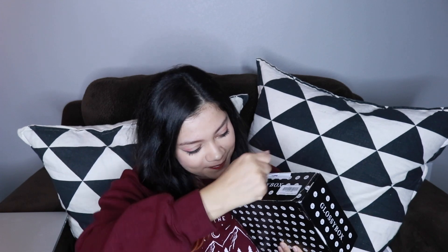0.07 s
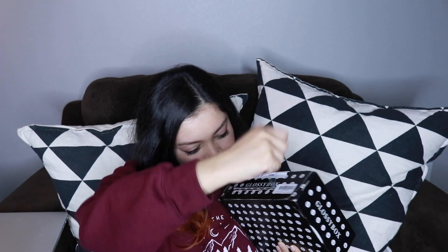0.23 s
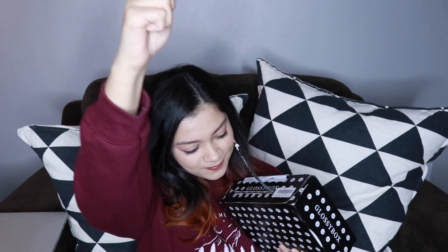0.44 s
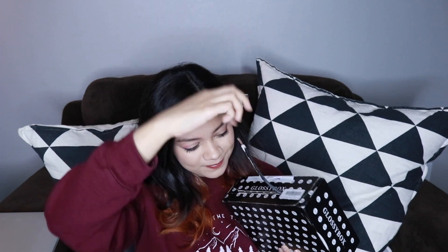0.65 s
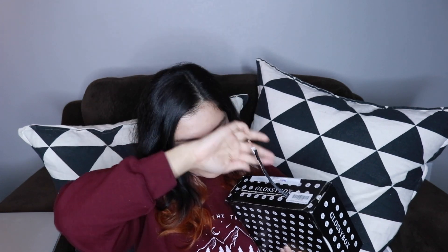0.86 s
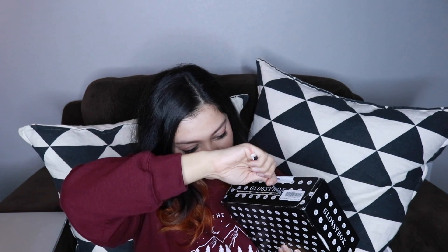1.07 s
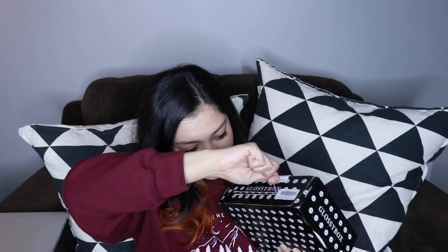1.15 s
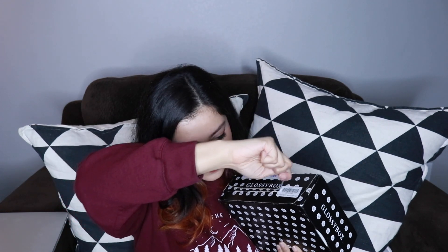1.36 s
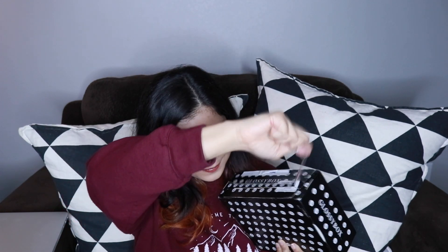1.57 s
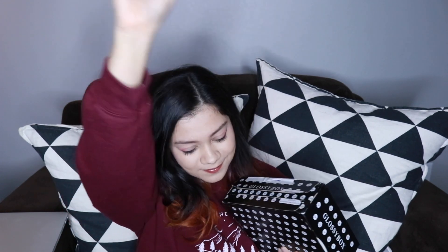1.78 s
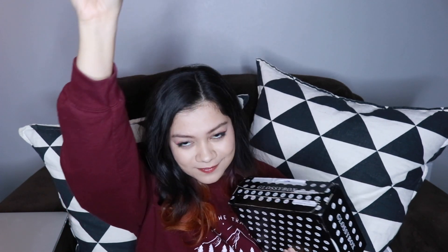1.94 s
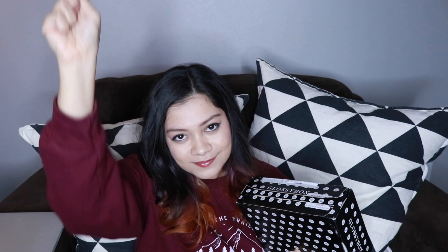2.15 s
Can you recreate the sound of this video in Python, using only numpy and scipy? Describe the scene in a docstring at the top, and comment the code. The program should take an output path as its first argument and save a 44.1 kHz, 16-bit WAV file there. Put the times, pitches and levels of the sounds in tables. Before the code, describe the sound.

Cardboard box pull strip ripped off in two loud, raspy tears, close up in a small room

```python
"""In a small room, close to the microphone, the pull strip of a cardboard box is ripped off in two hard pulls.
The strip gives in quick slips: each shakes the hollow box (a bank of resonances) and breaks a bunch of fibres
(dense clicks, coloured as rasp and fizz). Each pull ends in a snap; single cracks come between and within pulls.
Between the pulls fingers rub and tick softly, finding a new grip. Reflections, standing waves and a noise wash
make the room, over a faint room tone. The one microphone is louder on the left, and the tears overload it."""
import sys
import numpy as np
from scipy import signal
from scipy.fft import rfft, irfft, next_fast_len
from scipy.io import wavfile
from scipy.ndimage import uniform_filter1d

SR = 44100
rng = np.random.default_rng(int(sys.argv[2]) if len(sys.argv) > 2 else 0)


def generate_wav(sig):
    """Save sig (samples, or channels by samples) to the path in sys.argv[1] as 16-bit PCM at SR."""
    pcm = np.round(np.clip(np.atleast_2d(sig).T, -1, 1) * 32767).astype(np.int16)
    wavfile.write(sys.argv[1], SR, pcm)


N = 97328
TIME = np.arange(N) / SR  # s

# Fizz of the finest fibres in the second pull and in the cracks, relative: freq_hz, density_db (per Hz)
FIZZ_2 = [(100, -48), (2500, -30), (5500, -3), (8500, 0), (11000, -4.5), (14000, -5), (16000, -8.5)]
# Reverberation of the room: freq_hz, level_db (against direct sound), t60_s
ROOM = [(60, -20, .4), (150, -17.5, 0.48), (300, -19, 0.59), (600, -11.5, 0.65), (1340, -7.5, 0.82),
        (2160, -11, 0.68), (3900, -5.5, 0.84), (5000, -7.5, .7), (7000, -9.5, 0.63), (11000, -20, 0.56),
        (16000, -16, .35)]


def pulls():
    """Two hard pulls on the strip, each with its own course, speed and fibre colours."""
    # Course of each pull, before the balance of the parts: time_s, drone_db (box), rasp_db, fizz_db (treble)
    pull_1 = [(0, 10.5, 5, -14), (0.03, 8, 1, -15.5), (0.075, 10, -1.5, -15), (0.1, 5.5, -31, -21),
              (0.12, -0.5, -15, -22), (0.138, 8, -2.5, -12.5), (0.156, 4.5, -10, -26), (0.168, 2, -2, -24),
              (0.18, -12.5, -12, -23), (0.2, 5, -4, -29), (0.225, 1.5, 3, -20), (0.262, 6, -6, -28),
              (0.28, -2.5, -1.5, -25), (0.298, 0.5, -8.5, -19), (0.315, -4, -4, -32),
              (0.335, -51.5, -42, -70)]
    pull_2 = [(1.425, -50, -47, -62), (1.44, -22, -10, -25), (1.455, -15, -10, -22.5),
              (1.468, -0.5, -5, -20.5), (1.49, -1, -6, -19), (1.512, -8.5, -5.5, -18),
              (1.53, 1, -10.5, -17.5), (1.56, -1, -5, -15.5), (1.6, 3.5, -12.5, -17.5),
              (1.62, -4, -3.5, -13), (1.633, -1, 1, -19), (1.641, 5, -27, -12), (1.655, 6, -14, -8.5),
              (1.68, -53, -53, -60)]
    # Speed of each pull, as the rate at which the strip slips: time_s, rate_slips_per_s
    speed_1 = [(0.0, 347), (0.066, 296), (0.148, 265), (0.176, 299), (0.3, 287)]
    speed_2 = [(1.45, 276.9), (1.59, 300.9), (1.65, 258.6)]
    # Rasp of the breaking fibres in each pull, relative: freq_hz, density_db (per Hz)
    rasp_1 = [(40, -57), (250, -11), (620, -5), (800, 2.5), (1080, -5), (1300, -9), (1450, 4), (1620, -4.5),
              (2000, -4), (2700, -18.5), (3700, -12.5), (5000, -17.5), (7000, -27), (12000, -38)]
    rasp_2 = [(40, -44), (250, -9), (620, -7), (900, 0), (1220, -3), (1600, -6.5), (2300, -11), (3000, -13),
              (4100, -9), (5000, -18.5), (7000, -36), (12000, -57)]
    # Fizz of the finest fibres in the first pull, relative: freq_hz, density_db (per Hz)
    fizz_1 = [(100, -46), (2500, -6), (5500, -19), (8500, -0.5), (11000, -4), (14000, -1), (16000, -7.5)]
    first = tear(pull_1, speed_1, rasp_1, fizz_1, 0)
    second = tear(pull_2, speed_2, rasp_2, FIZZ_2, 1)
    return first + second


def tear(curve, speed, rasp_colour, fizz_colour, pull):
    """Each slip shakes the box and breaks a bunch of fibres; pull is 0 for the first, 1 for the second."""
    # Grain of each pull: jitter (of slip timing, log ratio), spread_db (of slip strength),
    # steady_share (of fibres that break between slips)
    grains = [(.24, 2.5, 1), (.2, 7, 0.4)]
    drone_db, rasp_db, fizz_db = -4.5, -6, -4  # balance of the three parts
    even_s, surge_s = 0.0054, 0.0083  # a steady pull evens out the drone; the rasp surges freely within surge_s
    slip_fade_s = 0.0033
    drone_gain, rasp_gain, fizz_gain = gains(curve)
    jitter, spread_db, steady_share = grains[pull]
    jerks = slips(speed, jitter, spread_db)
    bunches = steady_share + signal.lfilter([1], [1, -np.exp(-1 / (slip_fade_s * SR))], jerks)
    drone = evened(box(jerks, pull), even_s)
    rasp = evened(colour(bunches * fibres(), rasp_colour), surge_s)
    fizz = evened(colour(bunches * fibres(), fizz_colour), surge_s)
    return (from_db(drone_db) * drone_gain * drone
            + from_db(rasp_db) * rasp_gain * rasp
            + from_db(fizz_db) * fizz_gain * fizz)


def slips(speed, jitter, spread_db, count=400):
    """Uneven train of jerks, coming faster as the strip is pulled faster."""
    time_s, rate = np.transpose(speed)
    chance = rng.standard_normal((count, 2))
    moving = TIME > time_s[0] - 0.05
    travelled = np.cumsum(np.interp(TIME, time_s, rate) * moving) / SR  # counted in mean slips
    steps = np.exp(jitter * chance[:, 0] - jitter ** 2 / 2)  # mean 1
    at = np.searchsorted(travelled, np.cumsum(steps) - steps[0] / 2)
    inside = at < N
    return np.bincount(at[inside], from_db(spread_db * chance[inside, 1]), N)


def fibres(per_s=16000):
    """Breaking fibres as dense tiny clicks of uneven size and random sign; rms 1."""
    spread_db = 3
    size_db = spread_db * np.minimum(rng.exponential(1, N), 5)
    sizes = from_db(size_db) * rng.choice([-1, 1], N)
    return rms_one(sizes * (rng.random(N) < per_s / SR))


def box(push, pull):
    """The hollow box rings in its resonances; being small, it radiates little below its low limit."""
    # Resonances of the box, levels relative: freq_hz, width_hz, first_pull_db, second_pull_db
    box_modes = [(250.6, 36, -0.5, -28), (259.6, 25, 3, 3.5), (284, 38, -15.5, 11.5), (305.9, 8.8, 0.5, 6),
                 (341, 38, -4.5, -33), (407, 16, -8.5, -2.5), (488, 8.3, -17, -22), (474.9, 6.7, -12, 0),
                 (552, 6.7, -32, 6.5), (754, 25, -45, -12), (1212.5, 20, -12, 1)]
    low_limit_hz = 210.6
    ringing = 0
    for hz, width_hz, *levels_db in box_modes:
        ringing = ringing + from_db(levels_db[pull]) * resonance(push, hz, width_hz)
    return signal.sosfilt(signal.butter(2, low_limit_hz, "high", fs=SR, output="sos"), ringing)


def snaps():
    """The last fibres of each pull break at once: a hard click and brief crackle, ringing in the freed strip."""
    # The strip snaps free, levels before colouring: start_s, click_db, crackle_db, hold_s, fade_s
    snap_events = [(0.3059, 28, 5.5, 0.0022, .005), (1.6457, 17, 6, 0.0044, 0.0079)]
    # Colour of each snap, relative: freq_hz, density_db (per Hz)
    snap_colours = [
        [(40, -42), (150, -12.5), (280, 5), (650, -11.5), (900, 3), (1220, 2.5), (1550, -9), (1820, 3),
         (2100, -13), (2600, -15), (4100, -16), (7000, -22), (15000, -32)],
        [(40, -44), (130, -5), (240, 11.5), (700, -10), (1300, -3), (1700, -6), (2070, 2), (2600, -7.5),
         (3100, 0), (3380, -2), (3700, 4.5), (4050, -3.5), (4800, -16), (9000, -16), (15000, -26)],
    ]
    out = 0
    for (start_s, click_db, crackle_db, hold_s, fade_s), spectrum in zip(snap_events, snap_colours):
        click = from_db(click_db) * (np.arange(N) == int(start_s * SR))  # one sample
        crackle = from_db(crackle_db) * burst(start_s, fade_s, hold_s) * fibres()
        out = out + colour(click + crackle, spectrum)
    return out


def cracks():
    """The board cracks as the strip takes the strain: single short tears, each with a knock of the box."""
    # Cracks: start_s, knock_db (peak), crack_db, fizz_db, fade_s
    crack_events = [(.166, -11, 4, -20, 0.0021), (1.144, -27.5, -41, -62, 0.0023),
                    (1.331, -40, -21, -35, 0.0097), (1.353, -5, -13, -34, 0.0068),
                    (1.37, -35, -30, -26.5, 0.0047), (1.4, -10, -15.5, -26.5, 0.0076),
                    (1.438, -6.5, -27, -35, 0.0032), (1.633, -4, 9.5, -11, 0.0015)]
    # Colour of the cracks, relative: freq_hz, density_db (per Hz)
    crack_colour = [(40, -60), (300, -3), (600, -10.5), (900, 6), (1650, 3), (2300, -3.5), (2800, -7),
                    (4100, -7), (5200, -24.5), (12000, -31)]
    knocks, rasp, fizz = np.zeros(N), 0, 0
    for start_s, knock_db, crack_db, fizz_db, fade_s in crack_events:
        knocks[int(start_s * SR)] += from_db(knock_db)
        rasp = rasp + from_db(crack_db) * burst(start_s, fade_s)
        fizz = fizz + from_db(fizz_db) * burst(start_s, fade_s)
    unit_peak = np.abs(box(1. * (TIME == 0), 1)).max()
    knocking = box(knocks, 1) / unit_peak
    return knocking + colour(rasp * fibres(), crack_colour) + colour(fizz * fibres(), FIZZ_2)


def fingers():
    """Soft rubbing and small ticks, made of sparse and band-passed clicks, while the hand finds its grip."""
    # Fingers rubbing over the box: time_s, level_db
    rub_curve = [(.6, -56), (.76, -45.5), (.83, -54), (.985, -79), (1.005, -41.5), (1.04, -47.5),
                 (1.085, -41), (1.12, -44), (1.14, -58), (1.22, -47.5), (1.315, -46.5), (1.36, -24.5),
                 (1.39, -38), (1.43, -26.5), (1.7, -57), (2.02, -82), (2.11, -60), (2.2, -57)]
    # Colour of the rubbing, relative: freq_hz, density_db (per Hz)
    rub_colour = [(30, -33), (100, 3), (280, 18), (600, 14), (1500, 3), (4000, 11), (5500, -1), (13500, 1),
                  (16000, 2)]
    # Small ticks of fingers and the loose strip: start_s, level_db, fade_s, centre_hz, width_hz
    tick_events = [(.668, -41, 0.0032, 1886, 2640), (0.746, -44, .005, 3200, 5000),
                   (.818, -46, 0.00071, 11000, 6000), (0.944, -46, 0.0024, 600, 900),
                   (0.999, -42, .012, 8400, 9980), (1.09, -31.5, .0015, 8950, 6000),
                   (1.145, -29.5, 0.0015, 2600, 1780), (1.167, -41, 0.003, 11500, 2500),
                   (1.244, -36, 0.011, 250, 120), (1.27, -39, 0.0015, 4000, 8000),
                   (1.28, -38, .003, 4000, 8000), (1.307, -48, 0.0015, 7000, 9000),
                   (1.782, -22.5, 0.0005, 12000, 5000), (2.075, -43, 0.0042, 2994, 5000)]
    rub_gain, = gains(rub_curve)
    grain = fibres()
    ticks = 0
    for start_s, level_db, fade_s, hz, width_hz in tick_events:
        tick = rms_one(resonance(grain, hz, width_hz))
        ticks = ticks + from_db(level_db) * burst(start_s, fade_s) * tick
    return colour(rub_gain * fibres(per_s=5000), rub_colour) + ticks


def room(x):
    """Early reflections off the near walls, a few standing waves and the diffuse wash."""
    # Standing waves of the room: freq_hz, level_db, t60_s
    room_modes = [(254, -3, 0.26), (306.5, -9.5, 0.37), (496, 8.5, 0.44), (777, -3, 1), (901, -23, 0.99),
                  (1198, 6, 0.47)]
    early_db, early_delay_s, early_fade_s = -13, 0.00552, 0.029
    echoes = colour(burst(early_delay_s, early_fade_s) * rng.standard_normal(N), ROOM)
    early = from_db(early_db) * signal.fftconvolve(x, echoes / np.sqrt(np.sum(echoes ** 2)))[:N]
    standing = 0
    for hz, level_db, t60_s in room_modes:
        width_hz = np.log(1000) / (np.pi * t60_s)
        standing = standing + from_db(level_db) * resonance(x, hz, width_hz)
    return early + standing + wash(x)


def wash(x, count=42):
    """Diffuse reverberation: each band stores the energy it is fed and gives it back as dying noise."""
    delay_s = 0.0067
    edges, out = np.geomspace(70, 17000, count + 1), 0  # Hz
    white = rng.standard_normal((2, N))  # neighbouring bands take different noise
    for k, (low, high) in enumerate(zip(edges, edges[1:])):
        hz = np.sqrt(low * high)
        band = signal.butter(2, [low, high], "band", fs=SR, output="sos")
        keep = np.exp(-2 * np.log(1000) / (at_hz(ROOM, hz, axis=2) * SR))
        stored = signal.lfilter([1 - keep], [1, -keep], signal.sosfilt(band, x) ** 2)
        late = np.interp(TIME - delay_s, TIME, np.sqrt(stored))
        noise = rms_one(signal.sosfilt(band, white[k % 2]))
        out = out + from_db(at_hz(ROOM, hz)) * late * noise
    return out


def room_tone():
    """Faint steady background: white noise coloured to the spectrum of the room tone."""
    # Room tone, relative: freq_hz, density_db (per Hz)
    tone_colour = [(30, -30), (65, -12), (112, -3.5), (200, -3), (350, -0.5), (600, -8), (900, -16),
                   (1400, -22), (2100, -16), (3800, -24), (5500, -33), (15000, -30.5)]
    level_db = -48.5
    return from_db(level_db) * colour(rng.standard_normal(N), tone_colour)


def from_db(db):
    """Decibels to amplitude gain."""
    return 10 ** (np.asarray(db) / 20)


def rms_one(x):
    """Scale to an rms of 1."""
    return x / np.sqrt(np.mean(x ** 2) + 1e-20)


def at_hz(points, hz, axis=1):
    """Read a column of a table on a log-frequency axis."""
    points = np.array(points)
    return np.interp(np.log(np.maximum(hz, 1)), np.log(points[:, 0]), points[:, axis])


def gains(rows):
    """The dB columns of a curve as gains over time, silent before its first point."""
    time_s, *columns = np.transpose(rows)
    started = TIME >= time_s[0]
    return [from_db(np.interp(TIME, time_s, column)) * started for column in columns]


def colour(x, spectrum):
    """Causal (minimum-phase) filter with this spectrum; keeps the power of white noise."""
    size = 2 * next_fast_len(N)
    gain = rms_one(from_db(at_hz(spectrum, np.linspace(0, SR / 2, size // 2 + 1))))
    # Folding the cepstrum onto positive time gives the minimum phase
    cepstrum = irfft(np.log(gain))
    cepstrum[1:size // 2] *= 2
    cepstrum[size // 2 + 1:] = 0
    return irfft(rfft(x, size) * np.exp(rfft(cepstrum)))[:N]


def evened(x, span_s):
    """Hold the running level at 1, with the power averaged twice over the span."""
    size = max(int(span_s * SR), 2)
    power = uniform_filter1d(uniform_filter1d(x ** 2, size), size)
    return x / np.sqrt(np.abs(power) + 1e-12)


def burst(start_s, fade_s, hold_s=0):
    """Envelope with sudden start, hold and exponential fade."""
    return (TIME >= start_s) * np.exp(-np.clip((TIME - start_s - hold_s) / fade_s, 0, 40))


def resonance(x, hz, width_hz):
    """Two-pole band-pass, gain about 1 on top."""
    r = np.exp(-np.pi * width_hz / SR)
    return signal.lfilter([1 - r, 0, r - 1], [1, -2 * r * np.cos(2 * np.pi * hz / SR), r * r], x + 1e-18)


def scene():
    """Box, hands and room at one microphone, panned to the left."""
    right_db = -9.5  # against the left
    direct = pulls() + snaps() + cracks() + fingers()
    mono = direct + room(direct) + room_tone()
    return np.array([mono, from_db(right_db) * mono])


def record(dry):
    """Each channel overloads on its own, bending towards a ceiling; then the top is cut."""
    ceiling, hardness, cutoff_hz = 0.99, 19.7, 15865
    # The 3 also lowers quiet sound by about half a dB
    clipped = dry / (3 + np.abs(dry / ceiling) ** hardness) ** (1 / hardness)
    low_pass = signal.firwin(301, cutoff_hz, fs=SR)
    return signal.fftconvolve(clipped, low_pass[None], "same", axes=1)


dry = scene()
out = record(dry)
generate_wav(out)
```